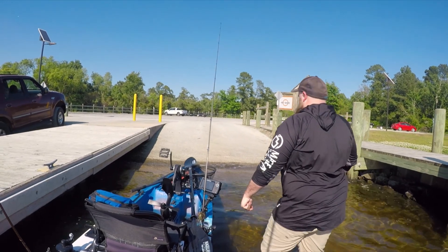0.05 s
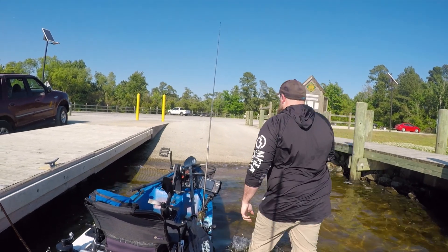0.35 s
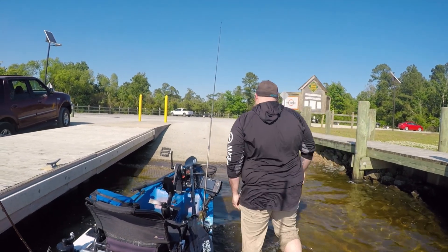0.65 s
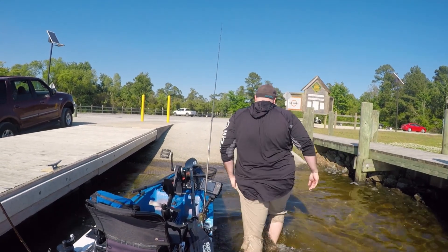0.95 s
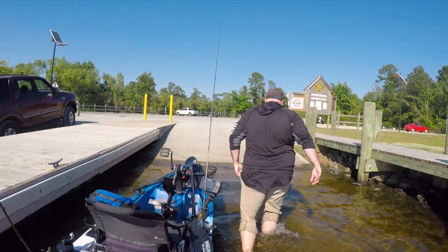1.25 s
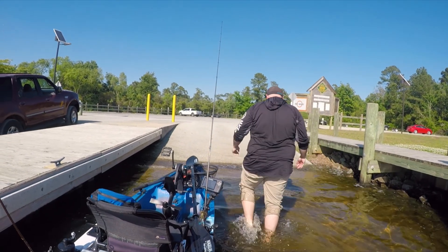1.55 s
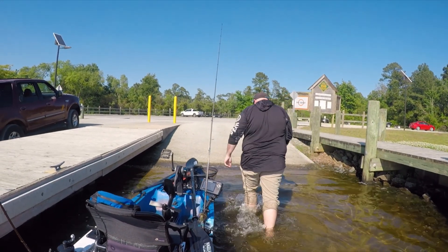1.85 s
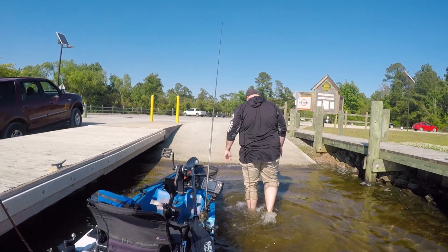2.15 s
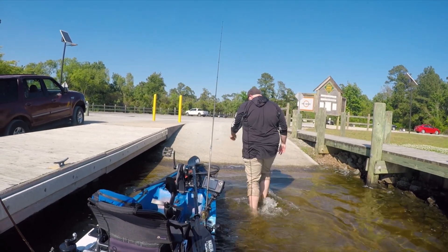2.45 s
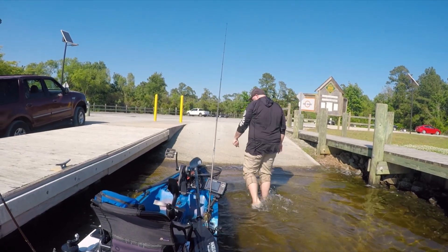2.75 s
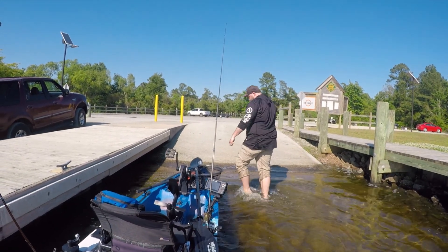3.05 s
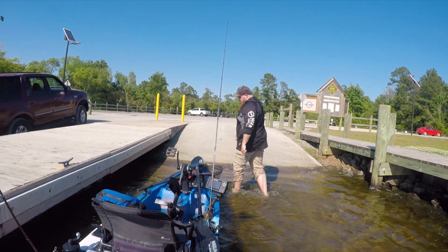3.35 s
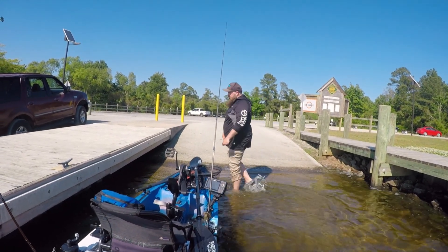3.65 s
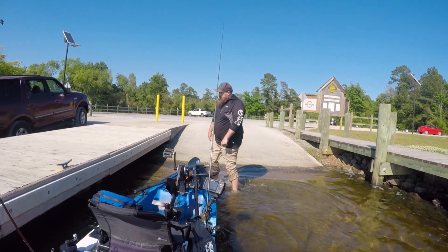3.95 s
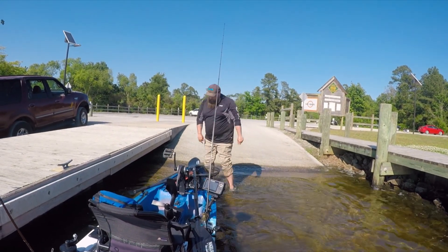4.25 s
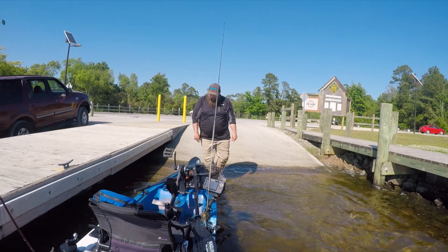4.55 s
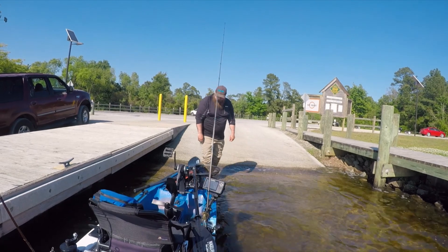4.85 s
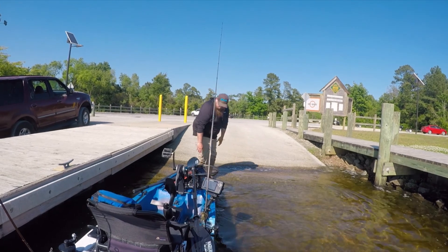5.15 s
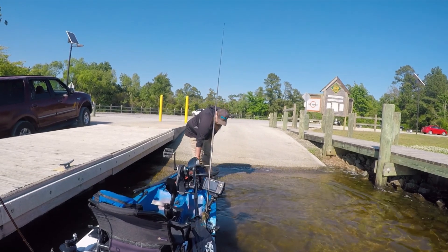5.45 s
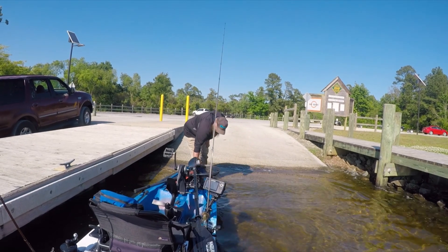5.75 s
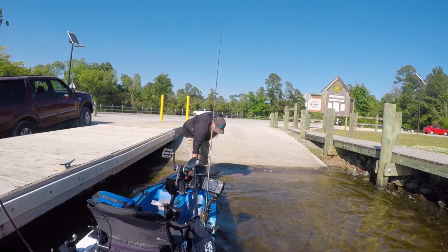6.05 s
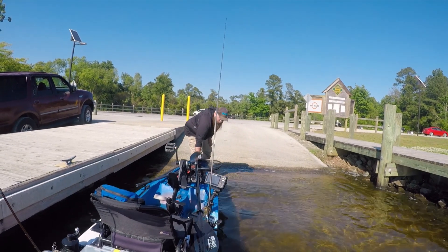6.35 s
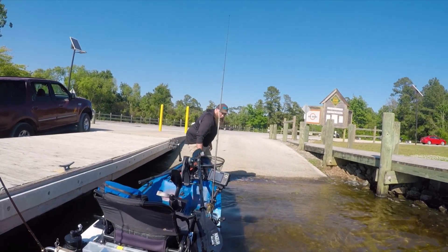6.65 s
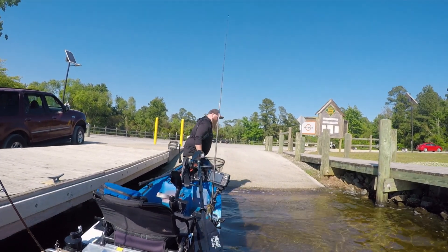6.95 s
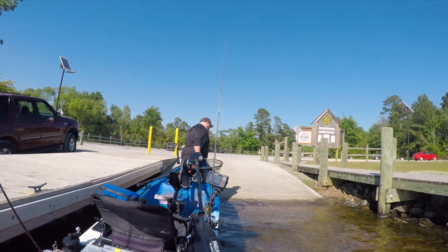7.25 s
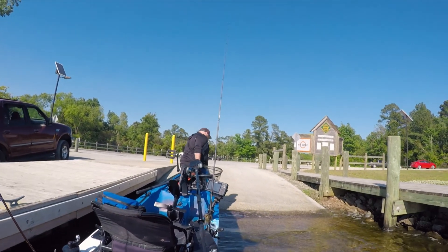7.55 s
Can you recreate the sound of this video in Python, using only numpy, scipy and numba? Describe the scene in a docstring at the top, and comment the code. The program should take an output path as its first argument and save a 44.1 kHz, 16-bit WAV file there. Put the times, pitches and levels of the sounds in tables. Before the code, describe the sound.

Sloshing steps and water glugging against a kayak give way to hollow plastic grinding and knocks on concrete, over a low engine hum.

```python
"""At a concrete boat ramp, someone wades beside a kayak, then hauls it out of the water in two pulls.
Legs stir up ringing air bubbles and spray, and ripples slap the hull. The keel (the boat's bottom edge)
sticks and slips on the concrete, so the hull booms and rasps. Loose tackle ticks and squeaks, an engine
idles, wind rumbles and a bird whistles. The microphone rides on the kayak, so the grinding shakes its
left and right halves in opposite directions."""
import sys
import numpy as np
from scipy import signal
from scipy.fft import rfft, irfft
from scipy.io import wavfile
from scipy.ndimage import uniform_filter1d, minimum_filter1d
from numba import njit

SR = 44100
rng = np.random.default_rng(int(sys.argv[2]) if len(sys.argv) > 2 else 0)


def digitize_waveform(pressure):
    """Quantize a signal to 16-bit integers and store it at the path in sys.argv[1].

    Rows of a 2-D input are taken as channels; values are limited to [-1, 1].
    """
    field = np.atleast_2d(pressure).T
    bounded = np.clip(field, -1, 1)
    quanta = np.round(bounded * 32767).astype(np.int16)
    wavfile.write(sys.argv[1], SR, quanta)


N = 339570
T = np.arange(N) / SR  # the time of each sample [s]

# steps through the water: (time [s], length of the push [s], deep gulps [dB], bubbles [dB], spray [dB])
STRIDES = [(.06, 0.33, -40.5, -48.5, -57.5), (.43, 0.088, -37, -47, -77), (.62, 0.23, -39.5, -78, -84),
           (1.09, 0.15, -38.5, -49, -81), (1.46, 0.13, -34.5, -51, -57), (1.78, 0.081, -38, -53, -50.5),
           (2.36, 0.086, -37, -49.5, -57), (2.48, 0.091, -34.5, -53, -59.5),
           (2.92, 0.054, -50, -50.5, -56.5), (3.06, 0.33, -49, -57, -66), (3.367, 0.14, -39, -46, -61),
           (3.55, 0.039, -33.5, -66, -82), (4.259, 0.069, -35, -47, -60), (5.059, 0.18, -38, -48, -64)]
# ripples between the steps: (time [s], deep gulps [dB], bubbles [dB], spray [dB])
RIPPLES = [(0, -47.5, -54, -54.5), (1.3, -43, -49.5, -57), (2.7, -38.5, -51.5, -58.5),
           (4.1, -45, -52.5, -60.5), (5.1, -44.5, -53.5, -61.5), (5.4, -58, -53.5, -67.5),
           (5.9, -45.5, -50.5, -66.5), (6.5, -56.5, -58.5, -90), (7.3, -57, -57.5, -80),
           (7.7, -57, -106, -69)]
# tone of the deep gulps: (frequency [Hz], level [dB])
GULP_TONE = [(60, -29), (95, 2), (130, 0), (200, -5), (265, -5), (320, -19.5), (450, -60)]
# tone of the bubbles: (frequency [Hz], level [dB])
BUBBLE_TONE = [(220, 4), (320, 4.5), (440, -2.5), (600, -2.5), (1000, -7), (1600, -10.5), (2300, -18.5),
               (3200, -32), (4500, -44)]
# tone of the spray: (frequency [Hz], level [dB])
SPRAY_TONE = [(1500, 5), (2500, -0.5), (3400, -7.5), (4000, -0.5), (4700, 2.5), (5700, -1.5), (6400, -1.5),
              (7300, -9), (9300, -9), (11400, -22), (12700, -17), (15500, -28.5)]
# big air pockets popping beside the hull: (time [s], peak [dB], pitch [Hz])
AIR_POCKETS = [(.15, -41, 820), (.168, -40, 750), (.201, -38, 690), (.379, -39, 785), (.866, -41, 596),
               (1.056, -41, 736), (1.186, -37, 700), (1.408, -45, 524), (1.803, -43, 647),
               (2.308, -39, 566), (2.363, -37.5, 724), (2.409, -43, 509), (2.557, -44, 616),
               (3.33, -48, 452), (3.394, -40, 1035), (3.412, -40, 396), (3.451, -43, 445),
               (3.508, -43, 520), (3.563, -42.5, 870), (4.235, -37.5, 1110), (4.257, -42, 423),
               (4.347, -38, 428), (4.352, -38, 638), (4.37, -44, 420), (5.085, -39, 390), (5.122, -45, 430),
               (5.335, -43, 596), (5.965, -39, 414), (6.029, -36, 458), (6.093, -34, 407), (6.32, -39, 450),
               (6.379, -31.5, 460)]
# waves glugging in the hollows under the hull: (time [s], peak [dB], pitch [Hz])
GLUGS = [(.257, -32, 227), (0.448, -28, 115.6), (.602, -36, 231), (0.74, -32.5, 240), (.877, -33, 191),
         (.941, -29, 179), (1.107, -22.5, 176.6), (1.45, -26.5, 158), (1.47, -24, 243), (1.587, -34, 250),
         (1.611, -25.5, 187.3), (1.684, -38, 170), (1.831, -27, 124), (2.0, -30, 182), (2.052, -29.5, 155),
         (2.251, -27, 179), (2.332, -30, 164), (2.37, -30, 237), (2.38, -29.5, 187), (2.419, -28, 145),
         (2.548, -33.5, 247.5), (2.727, -30.5, 231), (2.81, -29, 226), (2.817, -30.5, 149),
         (3.046, -32.5, 252), (3.456, -28, 188), (3.515, -26.5, 236), (3.565, -25.5, 158),
         (3.599, -25, 203), (3.676, -32.5, 213.7), (4.293, -30, 245), (4.345, -30.5, 147),
         (4.563, -33, 251.7), (4.586, -26, 167), (5.071, -30, 112.6)]
# water slapping the hull: (time [s], peak [dB], air pocket [Hz], upper ring [Hz], ring against peak [dB])
SLAPS = [(.531, -21, 430, 1014, -13.5), (1.132, -32, 747, 1180, -24), (1.233, -36.5, 890, 1290, -22),
         (1.449, -24, 412, 1386, -6.5), (1.941, -29.5, 760, 1496, -14), (2.912, -38.5, 654, 1798, -26),
         (4.337, -31.5, 455, 747, -23), (5.068, -32.5, 383, 1440, -11)]
# heavy drops hitting the water: (time [s], peak [dB], pitch [Hz])
DROPS = [(0.201, -37, 1260), (.379, -47, 2300), (.488, -64, 1410), (1.131, -38.5, 1950), (2.097, -38, 1370),
         (2.303, -36.5, 1230), (2.351, -36.5, 1700), (2.746, -38, 1780), (3.046, -44, 1774),
         (3.225, -40, 1282), (3.379, -39.5, 2200), (3.445, -43, 1200), (3.489, -41, 1390),
         (4.161, -42.5, 1392), (4.934, -47.5, 1900)]
# a foot comes up and sheds water: (time [s], level [dB], length [s])
SPLASHES = [(0.383, -46.5, 0.065), (1.308, -53, 0.23), (1.714, -54, 0.081), (2.293, -49, 0.15),
            (2.455, -56.5, 0.18), (3.327, -56, 0.092), (3.44, -59, 0.092), (4.179, -52.5, 0.21),
            (5.042, -52.5, 0.06)]

# the keel scraping up the ramp: (time [s], length [s], boom [dB], grit [dB], sand hiss [dB], growth [dB])
SCRAPES = [(5.232, 0.11, -26.5, -39.5, -86, -7), (5.49, 0.091, -27.5, -48, -63.5, -1),
           (5.6, 0.023, -19.5, -44, -73, -3), (5.703, 0.041, -31, -41.5, -69, -12),
           (5.97, 0.023, -24, -33, -51, -2), (5.984, 0.18, -21, -33.5, -59.5, 2.5),
           (6.193, 0.06, -22.5, -41.5, -66, -1), (6.278, 0.086, -20, -36.5, -65, -0.5),
           (6.71, 0.362, -23.5, -38.5, -76.5, 8), (7.617, 0.025, -25, -64, -90, -3)]
# the notes at which the hull and the microphone mount ring: (pitch [Hz], width [Hz], level [dB])
HULL_NOTES = [(44.7, 33, -3), (113, 47, -6.5), (176.4, 47.4, -2), (248.5, 66, -4), (454, 115, -8),
              (672, 97, -21), (860, 160, -28), (1002, 160, -27), (1158, 115, -20), (1450, 250, -27.5),
              (1850, 180, -43), (2060, 280, -43)]
# the notes of the hull's panels: (pitch [Hz], width [Hz], level [dB])
PANEL_NOTES = [(476.1, 92, 0.5), (670, 130, -9), (853, 120, -10), (990, 110, -8), (1160, 120, -5),
               (1455, 170, -7.5), (1960, 380, -30)]
# the keel catching on a ridge: (time [s], peak [dB], level of the upper notes [dB])
KNOCKS = [(5.228, -15.5, 20), (5.485, -13.5, -7), (5.558, -12.5, -16), (6.382, -5, -1), (7.034, -5.5, 0),
          (7.078, -8, 1), (7.174, -18, -1), (7.254, -19, -9), (7.649, -22, 0)]
# hard knocks cracking through the air: (time [s], peak [dB])
CRACKS = [(6.381, -28), (7.0758, -22.5), (7.0815, -42), (7.254, -47), (7.652, -44)]
# short runs of slips: (time [s], level [dB], length [s], treble tilt [dB per octave], panel pitch [Hz])
JUDDERS = [(5.226, -20.5, .006, -2, 876), (5.243, -24, .008, 0, 482), (5.286, -27.5, 0.0041, 12, 1470),
           (5.317, -33, 0.0076, 0, 1050), (5.332, -25.5, 0.0065, -17, 563), (5.481, -31, .01, -10, 558),
           (5.604, -26, .006, -14, 541), (5.923, -26, .025, 1, 489), (5.992, -21.5, .008, -8, 464),
           (6.031, -17.5, 0.0086, -12, 1017), (6.066, -15, .006, -19, 508), (6.089, -27, .008, 0, 1490),
           (6.103, -18, .016, -2, 1155), (6.161, -28, 0.011, 0, 1510), (6.197, -23, 0.011, -19, 493),
           (6.226, -17, .012, -6, 488), (6.302, -21, .004, 3, 974), (6.31, -27, .003, 6, 1480),
           (6.339, -16, .003, -1, 910), (6.346, -14.5, 0.0028, 6, 1240), (6.821, -35, 0.0073, 2, 1490),
           (6.903, -33, .006, -10, 471), (6.934, -26.5, .012, 6, 960), (6.959, -16, .003, 2, 1413),
           (6.983, -19, .016, -9, 464), (7.031, -16, 0.0041, 0, 970), (7.0752, -19, 0.0019, 6, 1210),
           (7.136, -36, .004, 7, 1450), (7.401, -34.5, .003, 16, 1170)]
# the sliding hull humming: (time [s], length [s], level [dB], pitch [Hz], waver [share of the pitch])
DRONES = [(5.956, 0.26, -22.5, 205.3, 0.091), (6.748, .12, -24.5, 178.9, 0.032),
          (7.028, 0.06, -23, 205, 0.098)]
# sand grains bursting under the keel: (time [s], peak [dB])
CRUNCHES = [(5.964, -34), (5.97, -40), (5.984, -44), (6.028, -40), (6.068, -53.5), (6.091, -46),
            (6.112, -44), (6.276, -51), (6.381, -44)]
# tone of the hissing sand: (frequency [Hz], level [dB])
SAND_TONE = [(2200, 7), (3300, 5.5), (4200, -0.5), (5400, 1.5), (7500, -1.5), (10000, -7), (12000, -25),
             (15000, -46)]

# tackle hitting a rod: (time [s], peak [dB], lowest note [Hz], main ring [Hz], ring against peak [dB])
TICKS = [(0.074, -32, 1806, 3700, -21), (.296, -29.5, 1870, 5040, -22), (.378, -43, 1840, 4920, -3),
         (0.418, -47, 1830, 5600, -14), (0.523, -31.5, 1920, 5120, -15), (0.669, -29.5, 1900, 3700, -15),
         (0.867, -31.5, 1840, 3700, -20), (1.131, -38, 1820, 4480, -9), (1.186, -30, 1830, 5180, -8.5),
         (1.299, -31.5, 1820, 3850, -16), (1.342, -45, 1860, 6150, -3), (1.763, -40, 1850, 3970, -11),
         (1.879, -30, 1880, 3670, -16), (1.939, -38.5, 1840, 4950, -11), (2.12, -32.5, 1790, 4300, -29),
         (2.379, -37, 1840, 4540, -15), (2.924, -31.5, 1863, 4100, -14), (3.245, -32.5, 1810, 3830, -19),
         (4.274, -32, 1850, 4693, -15)]
# the rod's notes, delayed as bending waves travel: (pitch [Hz], width [Hz], level [dB], delay [s])
ROD_NOTES = [(1849, 210, 6, 0.000068), (2520, 1900, -4, 0.0067), (3723, 320, 1.5, 0.00082),
             (4240, 880, 3.5, .0009), (5130, 660, 0.5, 0.0008), (6630, 1500, -5, 0.0043),
             (8800, 1800, -11, 0), (13030, 2000, -17, 0)]
# a metal fitting clinking as the bow is gripped: (time [s], peak [dB])
CLINKS = [(5.152, -40), (5.201, -39), (5.212, -40), (5.226, -30.5), (5.239, -32.5)]
# the fitting's notes: (pitch [Hz], width [Hz], level [dB])
FITTING_NOTES = [(4544, 555, -3), (4670, 2200, -9), (6270, 490, -17), (8450, 2400, -23)]
# thin, raspy squeaks: (time [s], length [s], level [dB], pitch [Hz])
SQUEAKS = [(1.161, 0.057, -56, 4700), (1.222, 0.017, -47, 4900), (1.287, 0.038, -51.5, 5100)]
# the idling engine: (time [s], firing rate [Hz], level [dB])
IDLE = [(0, 57.13, -31.5), (.6, 59.2, -35.5), (.9, 58.46, -30.5), (1.3, 58.4, -44), (1.5, 58.62, -33.5),
        (2.15, 58.2, -39.5), (2.95, 58.82, -30), (3.4, 59.52, -35.5), (4.1, 59.8, -37.5), (4.25, 59.9, -32),
        (4.75, 59.93, -35), (5.0, 60, -32), (5.5, 59.81, -35.5), (5.95, 60.16, -36), (6.5, 60.5, -50.5),
        (7.7, 61.1, -53.5)]
# gusts on the microphone: (time of the top [s], level [dB], length [s])
GUSTS = [(0.045, -32.5, 0.68), (0.56, -31.5, 0.69), (1.037, -31, 0.35), (1.557, -28.5, 0.55),
         (1.846, -27, 0.51), (2.764, -34.5, 2.16), (3.64, -31, 0.68), (4.303, -39.5, 0.9),
         (5.212, -32, 1.05), (5.764, -34, 0.21), (6.303, -38, .3), (6.9, -41, 0.44), (7.506, -41.5, 0.54)]
# tone of the wind's rumble: (frequency [Hz], level [dB])
WIND_TONE = [(12, -24), (22, -0.5), (33, 0), (42, -5), (52, -7), (80, -7), (130, -23.5), (300, -46.5)]
# the bird's calls: (time [s], peak [dB], pitch [Hz], length [s], overtones [dB])
WHISTLES = [(1.681, -46.5, 2118, 0.081, -16), (4.429, -50.5, 2106, 0.065, -28),
            (6.484, -55.5, 2130, 0.083, -12)]


def wading(boom, grit):
    """Legs and the moving hull push out deep gulps, fold air into bubbles and shed a patter of drops."""
    gulp_gain, bubble_gain, spray_gain = stirring()
    # the hull pushes water aside as it scrapes along
    gulp_gain = together([gulp_gain, boom * undb(-20)])
    bubble_gain = together([bubble_gain, grit * undb(-12.5)])
    gulps = froth(per_s=130, low_hz=80.4, high_hz=325, cycles=10.2, rise=0.15, spread_db=1)
    churn = rng.standard_normal(N)
    bubbles = froth(per_s=480, low_hz=326.5, high_hz=3244, cycles=20, rise=0.27, spread_db=2.5)
    wash = rng.standard_normal(N) * undb(3.77 * wander(45))
    drops = froth(per_s=300, low_hz=2466, high_hz=11280, cycles=51, rise=0.1, spread_db=1.5)
    fizz = rng.standard_normal(N) * undb(1.93 * wander(90))
    return (shape_tone(gulps + 0.51 * churn, GULP_TONE) * gulp_gain
            + shape_tone(bubbles + 2.6 * wash, BUBBLE_TONE) * bubble_gain
            + shape_tone(drops + 2.65 * fizz, SPRAY_TONE) * spray_gain)


def stirring():
    """How loud the gulps, bubbles and spray are: each step lifts them above the ripples."""
    gains = [undb(curves(RIPPLES))]
    for start, length, gulp_db, bubble_db, spray_db in STRIDES:
        push = swell(start, length, attack_s=0.01, release_s=0.21)
        fade = undb(-12 * np.maximum(T - start, 0))  # most foam comes as the leg enters
        foam = swell(start, length, attack_s=0.01, release_s=0.041) * fade
        gains.append(np.array([push * undb(gulp_db), foam * undb(bubble_db), foam * undb(spray_db)]))
    return together(gains)


def froth(per_s, low_hz, high_hz, cycles, rise, spread_db):
    """A steady swarm of bubbles of all sizes, each rising in pitch as it nears the surface."""
    out = np.zeros(N)
    for when, pitch, size, life in rng.random((int(per_s * N / SR), 4)):
        hz = low_hz * (high_hz / low_hz) ** pitch
        gain = undb(-spread_db * np.log(size + 0.016)) * np.sqrt(hz)
        add(out, when * N / SR, gain * ring(hz, cycles * (.5 + life), rise))
    return unit(out)


def lapping():
    """Waves trap air against the hull: round gulps, and slaps with a wet edge."""
    out, t = np.zeros(N), T[:SR // 8]
    for start, db, hz in AIR_POCKETS:
        add(out, start - .002, peak(ring(hz, cycles=22.5, rise=0.43), db))
    for start, db, hz in GLUGS:
        add(out, start, peak(ring(hz, cycles=14.9, rise=0.36, onset=0.49), db))
    for start, db, hz, ring_hz, ring_db in SLAPS:
        splat = resonate(noise_burst(t, 0.021), ring_hz, 1100)
        pocket = resonate(np.exp(-t / 0.00016), hz, hz / 3)
        pocket += 0.64 * resonate(np.exp(-t / 0.000092), hz, hz / 2)
        add(out, start - .001, peak(pocket, db))
        add(out, start, peak(ring(hz, cycles=42, rise=0.043), db - 12))
        add(out, start, peak(ring(ring_hz, cycles=42, rise=0.13), db + ring_db))
        add(out, start, peak(splat, db + ring_db))
    return out


def dripping():
    """A heavy drop clicks on the surface and leaves a small ringing bubble."""
    out, t = np.zeros(N), T[:SR // 25]
    for start, db, hz in DROPS:
        smack = noise_burst(t, 0.0063)
        add(out, start, peak(resonate(smack, hz, 1500) + 0.46 * resonate(smack, 3920, 1700), db))
        add(out, start + 0.00106, peak(ring(hz, cycles=29, rise=0.066), db - 8))
    return out


def splashes():
    """A sheet of water falls back as a short burst of fine drops."""
    gain = np.zeros(N)
    for start, db, length in SPLASHES:
        add(gain, start, undb(db) * np.hanning(int(length * SR)))
    drops = froth(per_s=1300, low_hz=4080, high_hz=6100, cycles=20, rise=0.092, spread_db=6)
    hiss = unit(resonate(rng.standard_normal(N), 5450, 2800))
    return gain * unit(drops + .5 * hiss)


def hauling():
    """How loud the boom, grit and sand are: each scrape builds and stops; the keel creeps in between."""
    aground_s = np.maximum(T - 5.13, 0)  # time since the keel touched the ramp
    creep_db = [-29 - 3 * aground_s, np.full(N, -51.5), -65.5 - 7 * aground_s]  # boom, grit, sand
    gains = [undb(creep_db) * np.minimum(aground_s / 0.094, 1)]
    for start, length, boom_db, grit_db, sand_db, growth_db in SCRAPES:
        progress = np.clip((T - start) / length, 0, 1)
        effort = swell(start, length, attack_s=0.097, release_s=0.028) * undb(growth_db * (progress - .5))
        gains.append(np.outer(undb([boom_db, grit_db, sand_db]), effort))
    return together(gains)


def grinding(boom, grit):
    """The keel sticks and slips on concrete, shaking the hull; coarse grains crunch into the panels."""
    slips = impacts(per_s=1100, spread_db=3.5) * undb(2 * wander(110))
    deep, upper = hull(slips, wander_db=4)
    grains = np.abs(impacts(per_s=45, spread_db=1))
    bursts = signal.lfilter([1], [1, -np.exp(-1 / (0.0032 * SR))], grains + 1e-18)  # each dies away fast
    crunch = unit(panels(bursts * impacts(per_s=1500, spread_db=3.5), tilt_db=3))
    return np.array([unit(deep) * boom, (unit(upper) * undb(4) + crunch * undb(-10.5)) * grit])


def hull(push, wander_db):
    """The hull's deep boom and upper notes; each swells and fades as the point of contact moves."""
    notes = []
    for k, (hz, width, db) in enumerate(HULL_NOTES):
        contact = undb(wander_db * wander(45, size=len(push)))
        notes.append((-1) ** k * undb(db) * resonate(push * contact, hz, width))
    deep = sum(note for note, (hz, _, _) in zip(notes, HULL_NOTES) if hz < 350)
    return deep, sum(notes) - deep


def panels(push, tilt_db):
    """The hull's panels ring; a harder contact tilts their sound towards the high notes."""
    lowest_hz = PANEL_NOTES[0][0]
    return sum((-1) ** k * undb(db + tilt_db * np.log2(hz / lowest_hz)) * resonate(push, hz, width)
               for k, (hz, width, db) in enumerate(PANEL_NOTES))


def knocks():
    """The keel catches on a ridge: a sharp blow, then the hull's deep and upper notes ring."""
    out, t = np.zeros((2, N)), T[:SR // 5]
    for start, db, upper_db in KNOCKS:
        blow = np.exp(-t / 0.00008) + 0.017 * noise_burst(t, 0.0037)
        deep, upper = hull(blow, wander_db=1)
        upper = undb(upper_db) * (upper + undb(-42) * resonate(blow, 1300, 1200))
        gain = undb(db) / np.abs(deep + upper).max()
        add(out[0], start, gain * deep)
        add(out[1], start, gain * upper)
    return out


def cracks():
    """The plastic shell snaps against the concrete."""
    out, t = np.zeros(N), T[:SR // 20]
    soften = signal.butter(4, 2800, fs=SR, output="sos")
    for start, db in CRACKS:
        snap = signal.sosfilt(soften, np.exp(-t / .00009) + 0.39 * noise_burst(t, 0.0031))
        add(out, start, peak(resonate(snap, 940, 1070) + 0.19 * resonate(snap, 2010, 830), db))
    return out


def judders(slips_per_s=520, ring_s=0.046):
    """The keel grabs, then breaks free in uneven slips that rasp the panels; one panel rings on."""
    out, t = np.zeros(N), T[:SR // 8]
    for start, db, length, tilt_db, hz in JUDDERS:
        slips = (rng.random(len(t)) < slips_per_s / SR) * rng.uniform(.3, 1, len(t))
        slips[0] = 1
        fade = np.exp(-np.maximum(t - length, 0) / 0.0049)
        add(out, start - .001, peak(panels(slips * fade, tilt_db), db - 1.5))
        add(out, start, peak(ring(hz, cycles=hz * ring_s, rise=-0.044, onset=0.87), db - 4.5))
    return out


def drone():
    """Sticking and slipping settle on one low note of the hull: a rough, wavering hum."""
    out = np.zeros(N)
    for start, length, db, hz, waver in DRONES:
        phase = phase_of(hz * (1 + waver * wander(60)))
        hum = unit(np.sin(phase) * undb(3 * wander(70)))
        out += hum * undb(db) * swell(start, length, attack_s=.015, release_s=0.013)
    return out


def crunches():
    """A grain is crushed in a quick run of tiny cracks, unrelated left and right."""
    out, t = np.zeros((2, N)), T[:SR // 30]
    for start, db in CRUNCHES:
        for channel in out:
            burst = noise_burst(t, 0.0041) * (rng.random(len(t)) < .15)
            crunch = resonate(burst, 2900, 3000) + 0.34 * resonate(burst, 4400, 4000)
            add(channel, start, peak(crunch, db))
    return out


def sand():
    """Grains hiss under the sliding keel, unrelated left and right."""
    return np.array([shape_tone(rng.standard_normal(N) * undb(2 * wander(120)), SAND_TONE)
                     for _ in range(2)])


def tackle():
    """Loose tackle chatters against a rod, at a new spot each time; two of the rod's notes ring on."""
    out, t = np.zeros(N), T[:SR // 10]
    contact = (1 - np.exp(-t / 0.0008)) * (np.exp(-t / .0052) + 0.16 * np.exp(-t / 0.027))
    for start, db, low_hz, ring_hz, ring_db in TICKS:
        tick = np.zeros(len(t))
        tuning = low_hz / ROD_NOTES[0][0]
        for hz, width, note_db, delay in ROD_NOTES + [(ring_hz / tuning, 350, 3, .001)]:
            chatter = np.interp(t - delay, t, contact) * rng.standard_normal(len(t))
            tick += undb(note_db) * resonate(chatter, hz * tuning, width)
        add(out, start - .001, peak(tick, db))
        add(out, start + .002, peak(ring(ring_hz, cycles=170, rise=0, onset=4.9), db + ring_db))
        add(out, start + 0.002927, peak(ring(low_hz, cycles=96, rise=0), db - 12.5))
    return out


def clinks():
    """A small metal fitting rattles and rings briefly."""
    out, t = np.zeros(N), T[:SR // 10]
    for start, db in CLINKS:
        rattle = noise_burst(t, 0.0066)
        clink = sum(undb(note_db) * resonate(rattle, hz, width) for hz, width, note_db in FITTING_NOTES)
        add(out, start, peak(clink, db))
    return out


def squeaks():
    """Tackle rubs in quick catches that ring one thin, high note."""
    catches = impacts(per_s=1200, spread_db=4)
    out = np.zeros(N)
    for start, length, db, hz in SQUEAKS:
        gain = undb(db) * swell(start, length, attack_s=.008, release_s=0.0077)
        out += unit(resonate(catches, hz, 480)) * gain
    return out


def engine():
    """An engine idles a little unevenly, humming at one, two and three times its firing rate."""
    firing_hz, level_db = curves(IDLE)
    phase = phase_of(firing_hz * (1 + 0.003 * wander(3.64)))
    hum = sum(undb(db + 1.73 * wander(6)) * np.sin(multiple * phase)
              for multiple, db in [(1, 4), (2, -5.5), (3, -14)])
    return unit(hum) * undb(level_db)


def wind():
    """Gusts swell and fade over a light breeze and rumble on the microphone."""
    gusts = [undb(db) * np.cos(np.pi * np.clip((T - top) / length, -.5, .5)) ** 2
             for top, db, length in GUSTS]
    breeze = undb(-43 - 0.5 * T)
    return shape_tone(rng.standard_normal(N), WIND_TONE) * together(gusts + [breeze])


def bird():
    """Three short whistles rise and level off; trees give them a brief echo from both sides."""
    out, t = np.zeros(N), T[:SR // 5]
    for start, db, hz, length, overtone_db in WHISTLES:
        progress = np.clip((T - start) / length, 0, 1)
        glide = 0.05 * (.125 - (1 - progress) ** 3)
        phase = phase_of(hz * (1 + glide + .003 * wander(200)))
        tone = np.sin(phase) + undb(overtone_db) * (np.sin(2 * phase) + undb(-7) * np.sin(3 * phase))
        out += peak(tone * np.sin(np.pi * progress) ** 2 * undb(1.5 * wander(178)), db)
    trees = rng.standard_normal((2, len(t))) * t * np.exp(-t / 0.015)
    echo = np.array([signal.fftconvolve(out, tail / np.linalg.norm(tail))[:N] for tail in trees])
    return out + undb(-9.5) * echo


def ring(hz, cycles, rise, onset=0.37):
    """A bubble or solid part rings and fades; it builds over `onset` cycles and `rise` bends its pitch."""
    n = int(cycles * SR / hz) + 2
    age = np.arange(n) / n
    tone = np.sin(2 * np.pi * cycles * age * (1 + rise * age / 2))
    return tone * np.exp(-5 * age) * (1 - np.exp(-age * cycles / onset))


def noise_burst(t, decay_s):
    """A puff of noise that dies away."""
    return rng.standard_normal(len(t)) * np.exp(-t / decay_s)


def impacts(per_s, spread_db):
    """Tiny random hits, a few much larger than the rest."""
    size = undb(spread_db * np.minimum(rng.exponential(size=N), 4))
    return unit((rng.random(N) < per_s / SR) * size * rng.choice([-1, 1], N))


def wander(per_s, size=N):
    """A smooth random wobble with a typical size of 1."""
    hold = int(SR / per_s)
    steps = np.repeat(rng.standard_normal(size // hold + 1), hold)[:size]
    return unit(uniform_filter1d(uniform_filter1d(steps, hold), hold))


def resonate(x, hz, width):
    """Make a sound ring around one pitch; a smaller width [Hz] rings longer."""
    b, a = signal.iirpeak(min(hz, .45 * SR), hz / width, fs=SR)
    return signal.lfilter(b, a, signal.lfilter(b, a, x + 1e-18))


def shape_tone(x, table):
    """Shape a sound's lows and highs by a table, fading beyond its ends; average level 1."""
    hz, db = np.transpose(table)
    octave, points = np.log2(np.fft.rfftfreq(N, 1 / SR) + 1), np.log2(hz)
    outside = np.abs(octave - np.clip(octave, points[0], points[-1]))
    return unit(irfft(rfft(x) * undb(np.interp(octave, points, db) - 20 * outside), N))


def swell(start, length, attack_s, release_s):
    """A loudness curve that rises around `start`, holds and dies away."""
    rise = np.clip((T - start) / attack_s + .5, 0, 1)
    return rise * np.exp(-np.clip((T - start - length) / release_s, 0, 20))


def phase_of(hz):
    """The running angle of a wave whose pitch changes."""
    return 2 * np.pi * np.cumsum(hz) / SR


def curves(table):
    """Join the rows of a timed table with straight lines, one curve a column."""
    times, *columns = np.transpose(table)
    return [np.interp(T, times, column) for column in columns]


def together(gains):
    """The combined gain of unrelated sounds: their powers add."""
    return np.sqrt(sum(gain ** 2 for gain in gains))


def add(track, start, sound):
    """Mix a short sound in at `start` seconds."""
    i = max(int(start * SR), 0)
    track[i:i + len(sound)] += sound[:N - i]


def undb(db):
    """Turn decibels into a gain to multiply by."""
    return np.exp(np.asarray(db) * (np.log(10) / 20))


def unit(x):
    """Scale to an average (rms) level of 1."""
    return x / np.sqrt(np.mean(x ** 2))


def peak(x, db):
    """Scale so the largest sample sits at `db`."""
    return x * undb(db) / np.abs(x).max()


@njit
def follow(x, attack_s, release_s):
    """Track a level, with one speed going up and another coming down."""
    out, level = np.empty(len(x)), 0.
    for i in range(len(x)):
        level += (x[i] - level) / (SR * (attack_s if x[i] > level else release_s))
        out[i] = level
    return out


def scene():
    """Most sound through the air sits in the middle; the hull's shaking is opposite left and right."""
    boom, grit, hiss = hauling()
    water = wading(boom, grit) + lapping() + dripping() + splashes()
    deep, upper = grinding(boom, grit) + knocks()
    deep, upper = deep + drone(), upper + judders()
    bow = undb(-26.5) * np.interp(T - .013, T, deep)  # the boom also comes through the air, a bit later
    air = water + tackle() + clinks() + cracks() + squeaks() + engine() + wind() + bow
    lean = undb(-16) * upper - undb(-19.5) * deep  # more upper notes on the left, more boom on the right
    # the highest treble reaches the microphone's two halves by different paths
    treble = signal.sosfilt(signal.butter(8, 12500, "high", fs=SR, output="sos"), air)
    side = deep + upper + undb(-0.5) * np.interp(T - .001, T, treble)
    mix = air + lean + np.array([side, -side]) + sand() * hiss + crunches() + bird()
    return mix * np.minimum(T / 0.0019, 1)


def record(dry):
    """The volume dips after hard blows, a limiter holds the peaks, and the highest treble is cut."""
    level = follow(np.abs(dry).max(axis=0), attack_s=0.0014, release_s=0.26)
    dipped = dry / np.maximum(level / undb(-11), 1)
    safe_gain = np.minimum(1, undb(-10) / (np.abs(dipped).max(axis=0) + 1e-9))
    smooth_gain = uniform_filter1d(minimum_filter1d(safe_gain, size=400), size=400)
    treble_cut = signal.ellip(8, .2, 70, 15400, fs=SR, output="sos")
    return signal.sosfilt(treble_cut, dipped * smooth_gain)


dry = scene()
out = record(dry)
digitize_waveform(out)
```